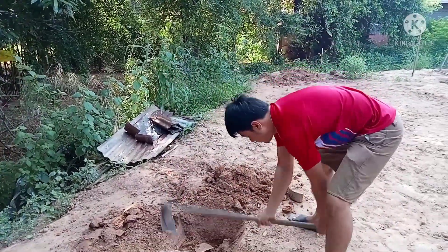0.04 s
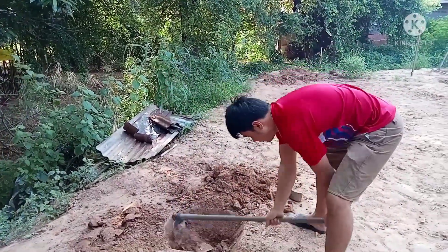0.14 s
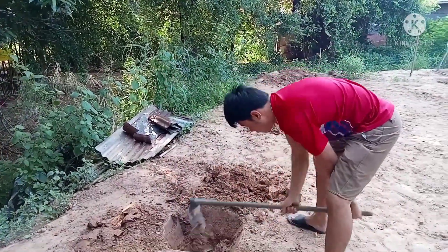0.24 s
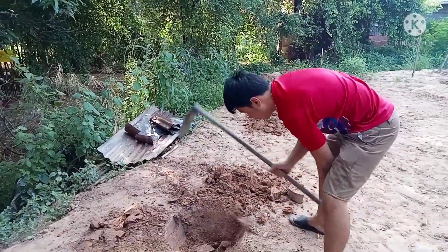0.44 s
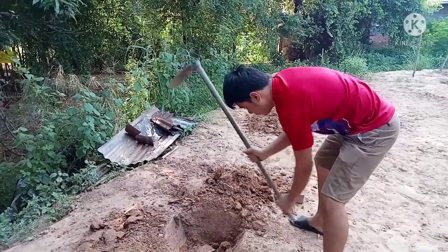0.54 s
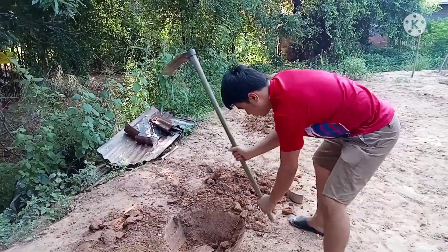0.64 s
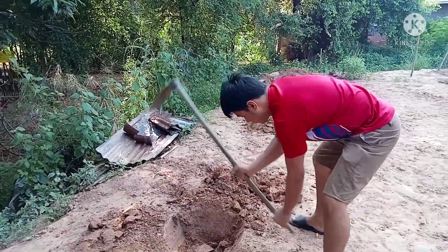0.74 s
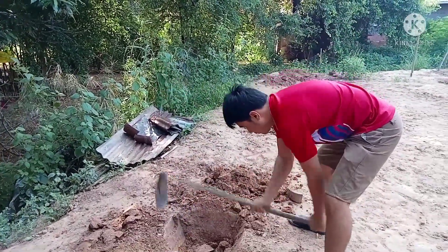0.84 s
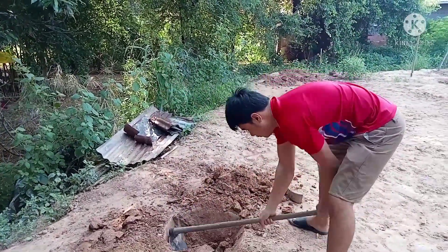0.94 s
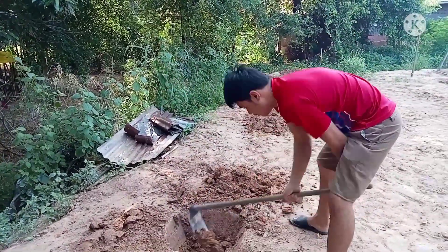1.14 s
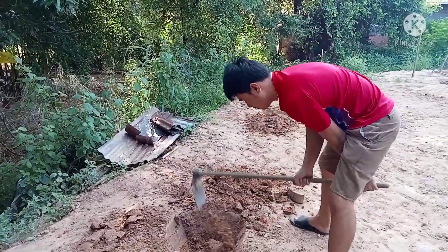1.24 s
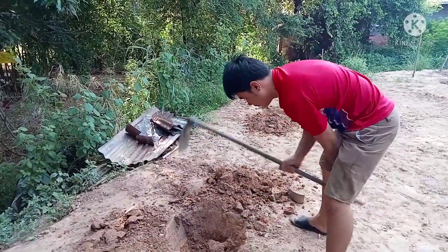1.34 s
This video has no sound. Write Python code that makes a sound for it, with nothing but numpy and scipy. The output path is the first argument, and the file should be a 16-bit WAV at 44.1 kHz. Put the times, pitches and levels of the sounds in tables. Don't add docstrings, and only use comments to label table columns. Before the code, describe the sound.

A hoe strikes hard dry soil twice, about a second apart, each blow a short steely crack with a thud and grit spray; clods knock and patter between, close up in a quiet yard.

```python
import sys
import numpy as np
from scipy import signal
from scipy.fft import rfft, irfft
from scipy.io import wavfile
from scipy.ndimage import uniform_filter1d

SR = 44100
rng = np.random.default_rng(int(sys.argv[2]) if len(sys.argv) > 2 else 0)


def wav_record(signal):
    frames = np.transpose(np.atleast_2d(signal))
    bounded = np.clip(frames, -1, 1)
    quanta = np.round(bounded * 32767).astype(np.int16)
    wavfile.write(sys.argv[1], SR, quanta)


def boost_factor(decibels):
    exponent = np.asarray(decibels, float) / 20
    return 10 ** exponent


N = 61739

# pitch_hz, level_db (per Hz)
SOIL_SPECTRUM = [(300, -16), (640, -18.5), (1050, -1.5), (1900, -6.5), (3500, -2), (5000, -9), (7600, -21),
                 (11800, -20.5), (16000, -34.5)]


def evened(x):
    return x / np.sqrt(np.mean(x ** 2) + 1e-20)


def read(points, hz):
    f, value = np.transpose(points)
    return np.interp(np.log(hz + 1), np.log(f + 1), value)


def colour(x, points, tilt_db=0.):
    hz = np.fft.rfftfreq(len(x), 1 / SR)
    gain_db = read(points, hz) + tilt_db * np.log2(hz / 3000 + 0.028)
    return irfft(rfft(x) * boost_factor(gain_db), len(x))


def resonate(x, hz, width):
    r = np.exp(-np.pi * width / SR)
    return 2 * signal.lfilter([1 - r], [1, -r * np.exp(2j * np.pi * hz / SR)], x + 0j).real


def noise_band(length, hz, width):
    noise = rng.standard_normal(length)
    return evened(resonate(resonate(noise, hz, width), hz, width))


def high_pass(x, hz):
    return signal.sosfilt(signal.butter(4, hz, "high", fs=SR, output="sos"), x)


def lay(events, voice):
    layer = np.zeros(N)
    for start_s, *settings in events:
        sound = voice(*settings)
        part = layer[round(start_s * SR):][:len(sound)]
        part += sound[:len(part)]
    return layer


def yard():
    # pitch_hz, level_db (per Hz)
    air_spectrum = [(25, -37), (70, -3), (400, -15), (990, -16), (1900, -23), (3500, -20), (5500, -30.5),
                    (12800, -32.5), (16000, -37)]
    # pitch_hz, width_hz, level_db
    drones = [
        (6740, 170, -76),
        (428.7, 59, -69),
        (164, 21, -63),
    ]
    air_db, patch_db, puff_db, puff_s = -56, 3.1, 7.5, 0.03
    hop = 256
    hz = np.fft.rfftfreq(1024, 1 / SR)
    real, imag, patches, puffs = rng.standard_normal((N // hop + 6, 513, 4)).T
    patches = uniform_filter1d(patches, size=10, axis=0)
    patches = evened(uniform_filter1d(patches, size=8, axis=1))
    puffs = uniform_filter1d(puffs, size=3, axis=0)
    puffs = evened(uniform_filter1d(puffs, round(puff_s * SR / hop), axis=1))
    bass = np.exp(-hz / 250)[:, None]
    cells = (real + 1j * imag) * boost_factor(patch_db * patches + puff_db * puffs * bass)
    hiss = signal.istft(cells, nperseg=1024, noverlap=768)[1][:N]
    out = boost_factor(air_db) * evened(colour(hiss, air_spectrum))
    for pitch, width, db in drones:
        out += boost_factor(db) * noise_band(N, pitch, width)
    return out


def scuff(length_s, db, hz, width):
    u = np.arange(3000) / (SR * length_s)
    shape = np.minimum(6 * u, 1) * np.clip(1.6 - 1.27 * u, 0, 1)
    return boost_factor(db) * shape * noise_band(3000, hz, width)


def sliding_crumbs():
    # start_s, length_s, level_db, centre_hz, width_hz
    slides = [(.134, 0.024, -52, 2980, 900), (0.291, 0.011, -44, 3800, 600), (.337, 0.015, -43, 2230, 500),
              (0.371, 0.015, -47, 1090, 700), (0.367, 0.01, -43, 3660, 900), (.418, 0.019, -48, 3600, 910),
              (0.425, 0.023, -49.5, 1720, 350), (0.461, 0.024, -47, 3340, 1200),
              (0.489, 0.041, -49, 3400, 910), (.885, 0.025, -56, 4160, 900),
              (.908, 0.034, -55.5, 1770, 450), (0.947, 0.039, -49.5, 564, 500),
              (.996, 0.05, -54.5, 640, 400), (0.199, .02, -56.5, 850, 250), (0.253, 0.021, -36, 5160, 1800),
              (0.25, 0.026, -37.5, 11500, 3000), (0.373, 0.0098, -48.5, 12000, 3500),
              (.665, 0.018, -57, 12300, 2500), (0.855, .005, -37.5, 9300, 2000),
              (1.188, .004, -55, 13000, 2000), (1.2365, 0.0055, -40, 12400, 2500),
              (1.244, 0.015, -48, 12200, 1500)]
    return lay(slides, scuff)


def knock(db, hz, t60, sparkle_db):
    rise_s, crack_s, crack_db = 0.00081, 0.0016, -9
    t = np.arange(2000) / SR
    crack_noise, spit_noise, waver_noise = rng.standard_normal((3, 2000))
    waver = hz / 9000 * evened(uniform_filter1d(waver_noise, size=40))
    swell = 1 - np.exp(-t * hz / 1.12)
    ring = swell * np.sin(2 * np.pi * hz * t + waver) * boost_factor(-60 * t / max(t60, 0.003))
    burst = (1 - np.exp(-t / rise_s)) * np.exp(-t / crack_s)
    crack = boost_factor(crack_db) * evened(colour(crack_noise, SOIL_SPECTRUM))
    spit = boost_factor(sparkle_db - 1.0) * evened(resonate(spit_noise, 11040, 2360))
    return boost_factor(db) * (ring + burst * (crack + spit))


def clods():
    # start_s, peak_db, pitch_hz, t60_s, sparkle_db
    clod_hits = [(0.136, -39.5, 3180, 0.016, -49), (0.182, -41, 3110, 0.0095, -26.5),
                 (0.199, -50, 815, 0.02, -4), (0.287, -24, 3370, 0.015, -24),
                 (0.305, -25.5, 3050, 0.013, -41), (0.339, -35, 3590, 0.027, -30),
                 (0.3735, -24, 3714, 0.011, -13), (0.384, -32, 3600, 0.015, -15),
                 (0.428, -45, 1750, 0.0067, -30), (0.464, -41, 3320, 0.007, -26.5),
                 (0.509, -38, 3770, 0.008, -29.5), (0.649, -39, 1020, 0.013, -37),
                 (0.667, -31, 900, 0.0065, -14), (0.681, -47, 990, 0.021, 0),
                 (0.717, -35.5, 3360, 0.0054, -12),
                 (.8495, -27, 902, 0.035, -9), (0.853, -30, 4100, 0.012, -6),
                  (0.8545, -18, 1093, 0.012, -9), (0.862, -18.5, 4260, 0.012, -6),
                  (.8620, -18.5, 1830, 0.017, -4.5), (0.8721, -34, 4030, 0.0051, -2.5),
                  (0.9716, -18, 880, 0.011, -20), (0.9732, -25.5, 4250, 0.011, -28),
                  (0.979, -29, 1050, 0.02, -11), (0.9924, -21.5, 4200, 0.0061, -18),
                  (0.997, -29, 2710, 0.016, -16), (1.1883, -45, 3430, 0.0067, 5),
                  (1.218, -37, 3230, 0.0055, -18), (1.2369, -19.5, 3680, 0.0046, -12),
                  (1.2380, -26.5, 1690, 0.007, -9), (1.247, -25, 3960, 0.015, -6.5),
                  (1.2488, -20, 3100, 0.0028, -30), (1.2531, -21, 2760, 0.0071, -14.5)]
    # start_s, peak_db, pitch_hz, t60_s, sparkle_db
    further_knocks = [
        (.289, -27.5, 860, 0.024, -11),
        (0.24, -25, 4300, 0.0071, -22),
        (.340, -30, 2600, 0.008, -26),
        (0.14, -36, 1070, 0.02, -22),
        (0.23, -26, 4100, 0.0055, -18),
    ]
    return lay(clod_hits + further_knocks, knock)


def grains():
    # low_hz, high_hz
    size_bands = [(200, 1600), (1600, 2700), (2700, 5000), (5000, 8500), (8500, 18000)]
    grains_per_s, spread_db, grain_s, smooth = 2200, -1.5, 0.0018, 0.99
    raw, hz = np.zeros(N), np.fft.rfftfreq(N, 1 / SR)
    for low, high in size_bands:
        landing = rng.random(N) < grains_per_s / SR
        hits = landing * boost_factor(spread_db * np.minimum(rng.exponential(1, N), 4))
        lumps = evened(signal.lfilter([1], [1, -np.exp(-1 / (grain_s * SR))], hits))
        patter = evened((smooth + lumps) * rng.standard_normal(N))
        raw += irfft(rfft(patter) * ((hz >= low) & (hz < high)), N)
    return evened(raw)


def grit():
    # start_s, hold_s, level_db, fade_db_per_s, tilt_db_per_octave
    showers = [(0.142, 0.059, -56, 17, 5.5), (0.234, 0.024, -33.5, 892, 0),
               (0.2505, 0.02, -24.5, 2496, -1.5), (0.262, 0.012, -36, 140, 0.5), (0.328, .18, -51, 149, 4),
               (0.365, 0.0051, -43, 310, 1), (0.661, 0.012, -56.5, 97, 8), (0.8476, 0.023, -37, 904, -6.5),
               (0.862, 0.0093, -46.5, 79, 7), (0.937, 0.047, -48.5, 160, -5), (0.968, 0.011, -44.5, 197, 6),
               (1.091, 0.017, -25.5, 2491, -1), (1.108, 0.13, -46.5, 138, -1),
               (1.112, 0.012, -38, 105, 0.5), (1.22, 0.038, -45.5, 274, 1)]
    # pitch_hz, width_hz, level_db
    crumb_tones = [(1330, 20, -16), (2064, 92, -0.5), (3600, 126, 0.5), (4300, 63, -27)]
    t, out, raw = np.arange(N) / SR, np.zeros(N), grains()
    raw = raw + sum(boost_factor(db - 3.5) * resonate(raw, hz, 0.98 * width) for hz, width, db in crumb_tones)
    for start_s, hold_s, db, fade_db, tilt_db in showers:
        start = np.clip((t - start_s) / 0.0032, 0, 1)
        fade = boost_factor(db - fade_db * np.maximum(t - start_s - hold_s, 0))
        shifted = np.roll(raw, rng.integers(N))
        out += start * fade * evened(colour(shifted, SOIL_SPECTRUM, tilt_db))
    return out


def blade_strikes():
    # start_s, peak_db, pitch_hz, t60_s, sparkle_db
    strikes = [(.2364, -21, 2950, 0.011, -10), (0.2417, -24.5, 1130, 0.021, 2),
               (0.2524, -2, 2790, 0.007, -22), (.2540, -5.5, 3580, 0.0034, -31),
               (0.2541, -11, 1010, 0.021, -8.5), (0.2556, -32, 3810, 0.017, -20),
               (.2588, -13, 1530, 0.0072, -5), (0.2608, -15.5, 3640, 0.019, -23),
               (0.2655, -9.5, 2570, 0.0054, -18), (0.2687, -13, 3910, 0.012, -5),
               (0.270, -15, 1365, 0.01, -12), (1.0920, -26, 3050, .012, 1.5),
               (1.0945, 0, 3436, 0.0093, -20), (1.0948, -6, 2870, 0.01, -32.5),
               (1.0968, -4, 1200, 0.0098, -19), (1.0968, -8, 5440, 0.0046, -8.5),
               (1.0984, -18, 2860, 0.0033, -30), (1.1028, -19.5, 3520, 0.0041, 2),
               (1.1039, -8, 1150, 0.0088, -40)]
    return lay(strikes, knock)


def thud(db, hz, t60):
    t = np.arange(9000) / SR
    drift = uniform_filter1d(rng.standard_normal(9000), size=300)
    waver = evened(uniform_filter1d(drift, size=300))
    push = np.sin(2 * np.pi * hz * t + waver - waver[0])
    return boost_factor(db - 60 * t / t60) * (1 - np.exp(-t / 0.0025)) * push


def ground_thuds():
    # start_s, peak_db, pitch_hz, t60_s
    pushes = [(0.238, -34, 299, 0.1), (0.255, -29.5, 256, 0.033), (0.265, -30, 222, 0.097),
              (0.27, -37, 135, 0.096), (0.371, -40, 170.5, 0.052), (0.849, -31, 474, 0.046),
              (0.856, -39, 177, 0.073), (0.901, -49.5, 84, 0.35), (0.97, -39.5, 161, .08),
              (1.095, -20.5, 194, 0.034), (1.092, -28, 101, 0.044), (1.099, -28.5, 302, 0.06),
              (1.25, -45, 63, 0.28)]
    return lay(pushes, thud)


def snap(db, hz, swell_s):
    t = np.arange(1500) / SR
    u = t / swell_s
    return boost_factor(db) * u * np.exp(1 - u) * np.sin(2 * np.pi * hz * t)


def stone_snaps():
    # start_s, peak_db, pitch_hz, swell_s
    breaks = [(.2526, -8.5, 2744, 0.00068), (.2538, -8, 2690, 0.00023), (.2570, -10.5, 3450, 0.00021),
              (.2588, -18, 2580, .0004), (.2651, -10, 2290, 0.00036), (.2675, -21, 3350, 0.00048),
              (.2442, -24.5, 970, 0.00051), (.2775, -29, 330, 0.00084), (.3051, -26.5, 2300, 0.00017),
              (.2528, -10, 4170, 0.00033), (.2560, -22, 1520, 0.00064), (.3740, -33, 2300, 0.00042),
              (.3890, -37, 2660, 0.00065), (.4035, -38, 3500, 0.00047), (.8510, -26.5, 705, 0.00025),
              (.8590, -30.5, 510, 0.0016), (.8732, -32, 2030, 0.00034), (.9720, -39, 1980, 0.0011),
              (.9770, -38, 1980, 0.0008), (.9770, -43, 4370, .001), (.9845, -42, 3180, 0.00077),
              (1.0010, -46, 4250, 0.0009), (1.0105, -48, 2430, 0.00065), (1.0140, -43, 2380, 0.00075),
              (1.0948, -17, 3600, 0.00096), (1.0960, -12, 1870, 0.00046), (1.0995, -12.5, 3030, 0.00036),
              (1.1035, -15.5, 3130, .0005), (1.1038, -12, 963, 0.0017), (1.1165, -33.5, 1036, 0.0012)]
    return lay(breaks, snap)


def far_hum():
    # start_s, end_s, pitch_hz, level_db
    passing = (0.5, 1.24, 463, -62)
    start_s, end_s, hz, db = passing
    t = np.arange(N) / SR
    swell = np.sin(np.pi * np.clip((t - start_s) / (end_s - start_s), 0, 1))
    return boost_factor(db) * swell * noise_band(N, hz, 24)


def scene():
    air = yard() + grit() + far_hum()
    knocks = high_pass(clods() + blade_strikes(), 705)
    ground = high_pass(sliding_crumbs() + ground_thuds() + stone_snaps(), 55)
    return (air + knocks + ground)[None]


def roll_off(x):
    return signal.sosfilt(signal.butter(12, 16660, fs=SR, output="sos"), x)


def record(dry):
    # start_s, end_s
    dip_span = (1.066, 1.0905)
    dip_db, fall_s, recover_s = -17, 0.014, 0.0044
    t = np.arange(N) / SR
    dip = np.clip((t - dip_span[0]) / fall_s, 0, 1) * np.clip((dip_span[1] - t) / recover_s, 0, 1)
    edge = signal.firwin(255, 15600, window=("kaiser", 7), fs=SR)
    mix = signal.oaconvolve(dry * boost_factor(dip_db * dip), edge[None], "same")
    return roll_off(mix)


dry = scene()
out = record(dry)
wav_record(out)
```